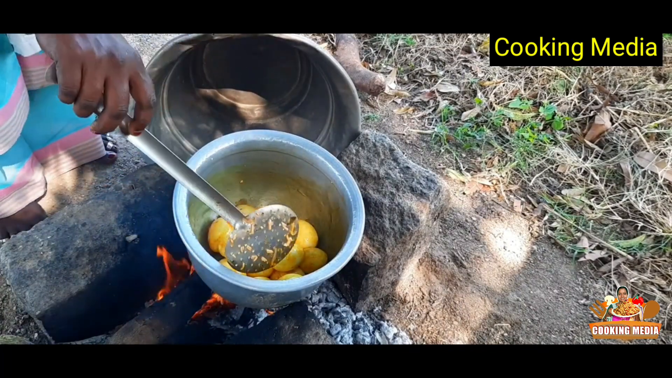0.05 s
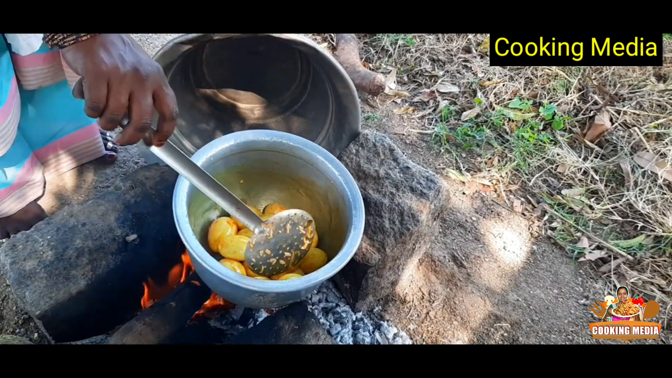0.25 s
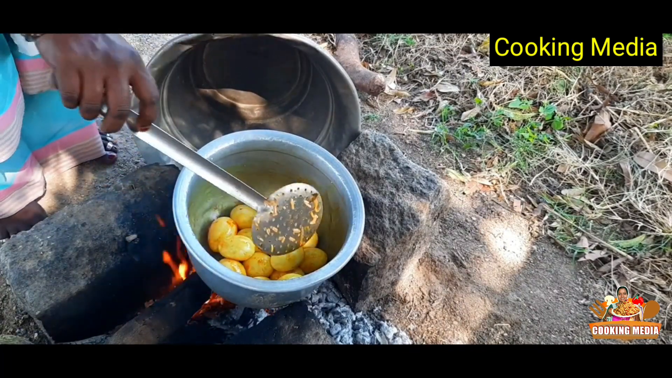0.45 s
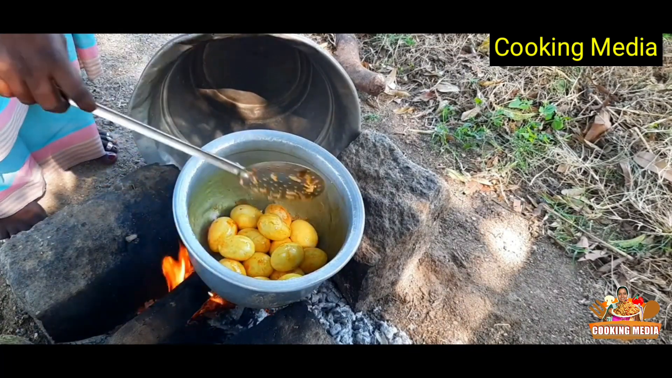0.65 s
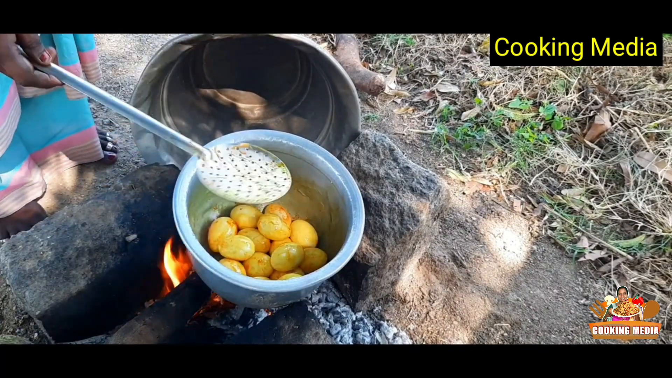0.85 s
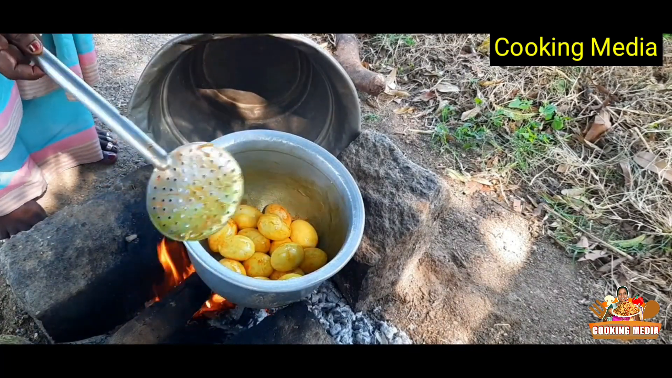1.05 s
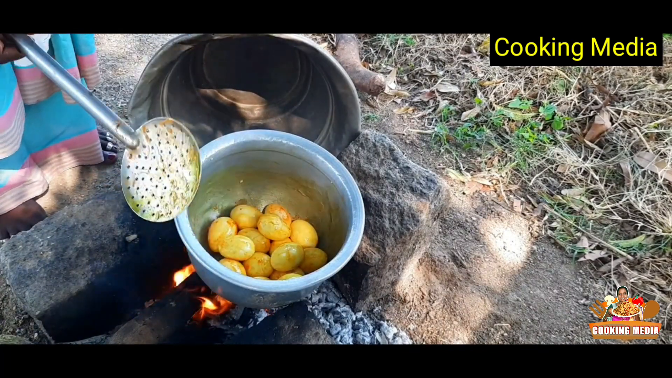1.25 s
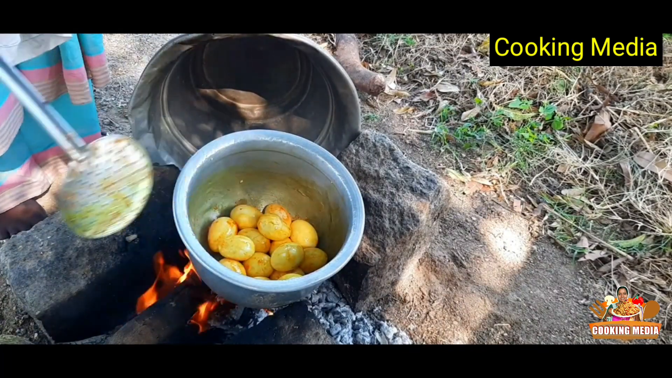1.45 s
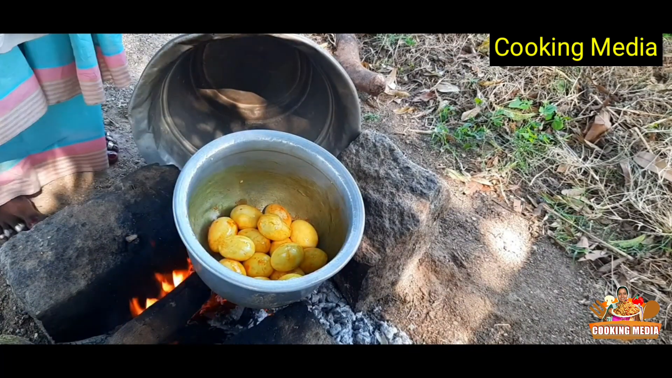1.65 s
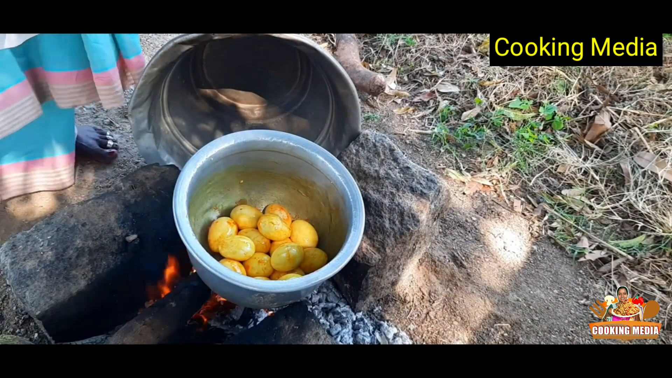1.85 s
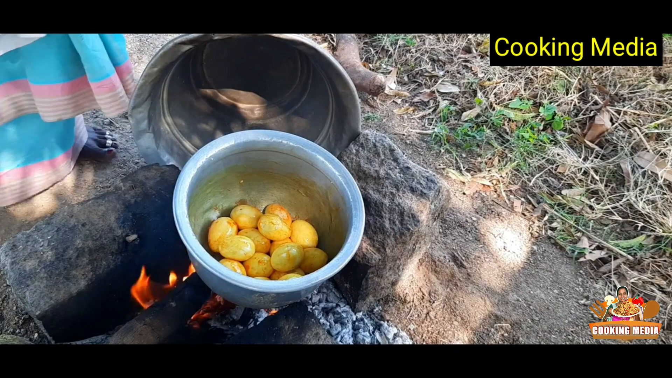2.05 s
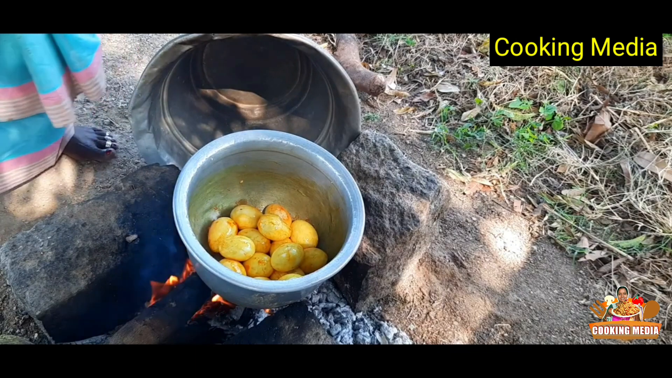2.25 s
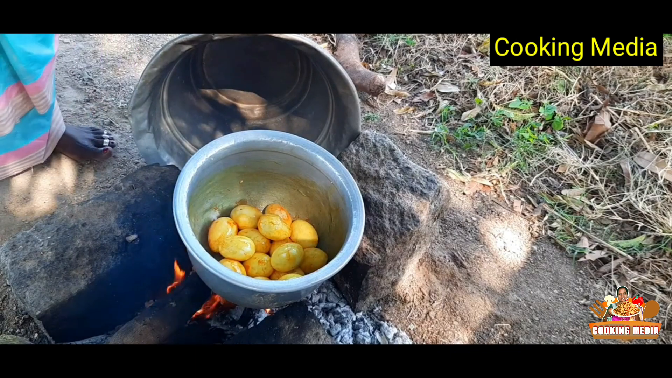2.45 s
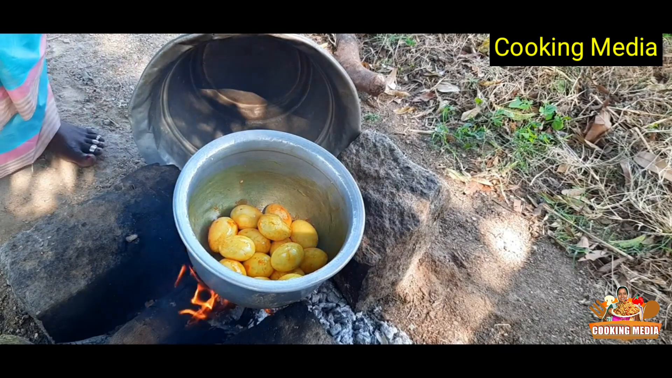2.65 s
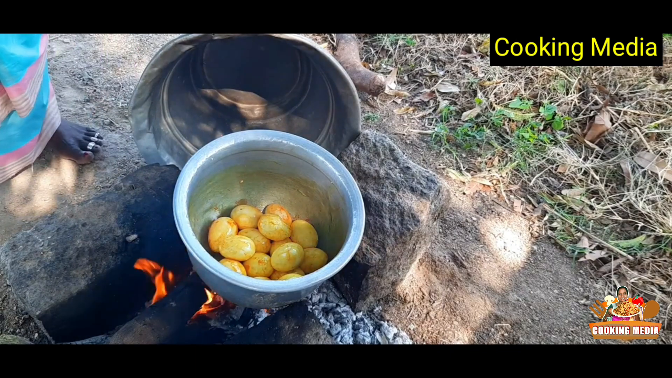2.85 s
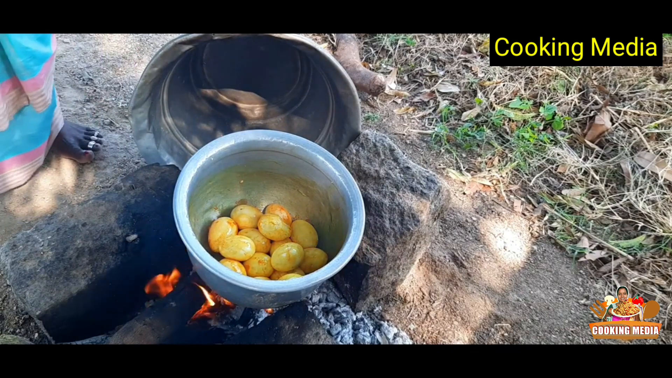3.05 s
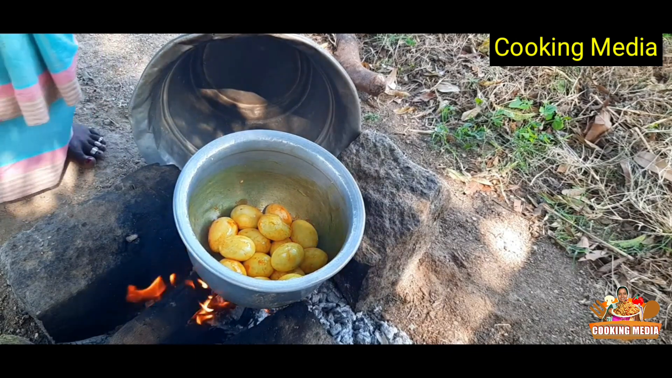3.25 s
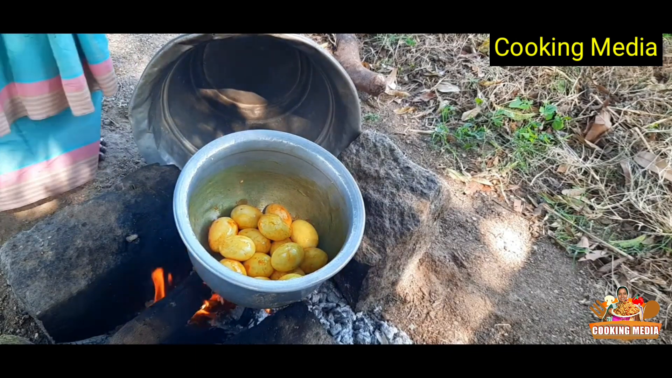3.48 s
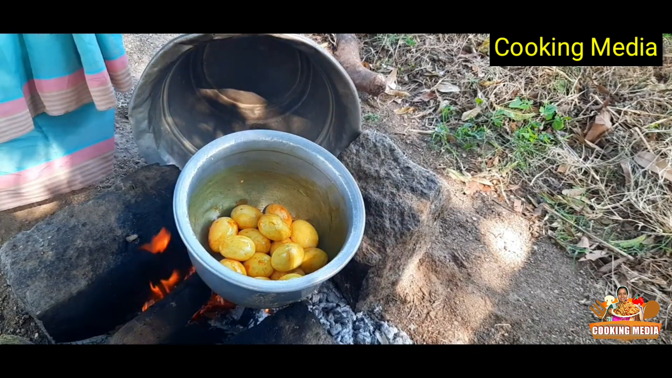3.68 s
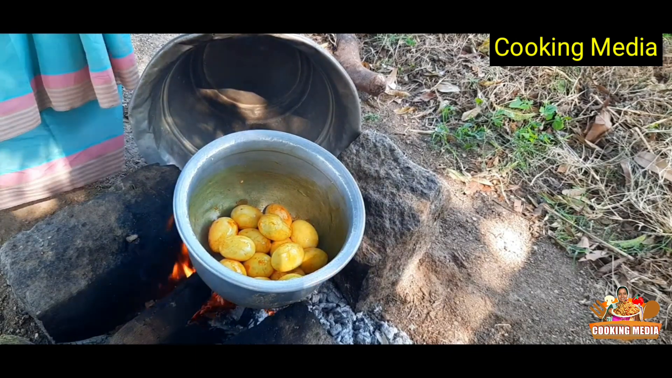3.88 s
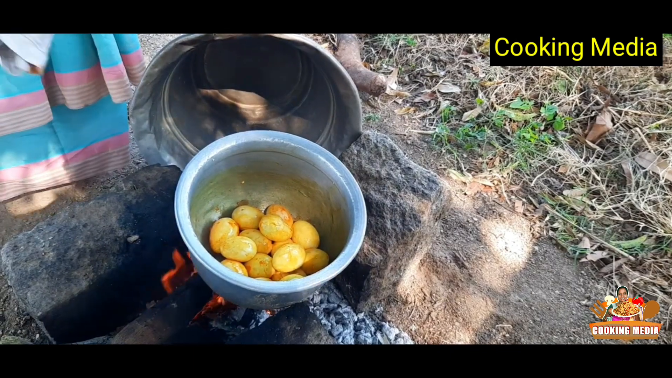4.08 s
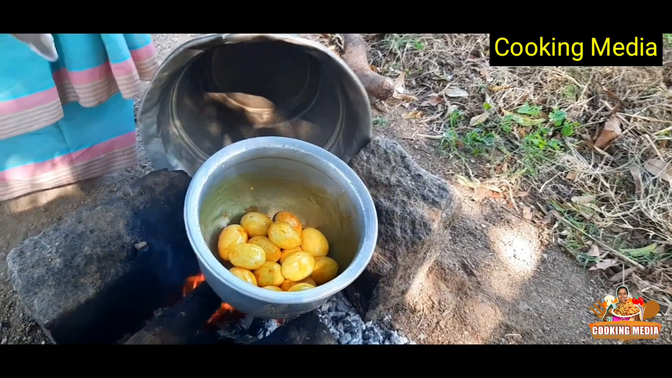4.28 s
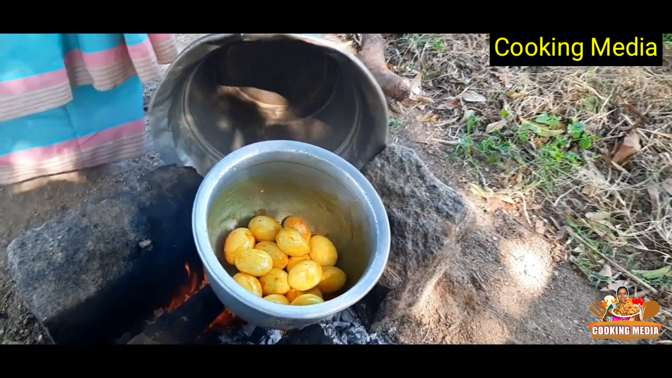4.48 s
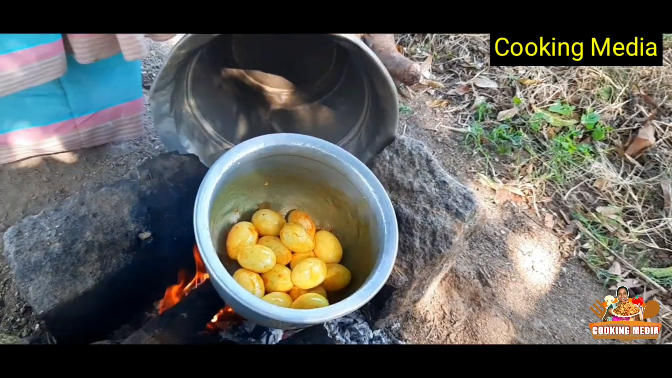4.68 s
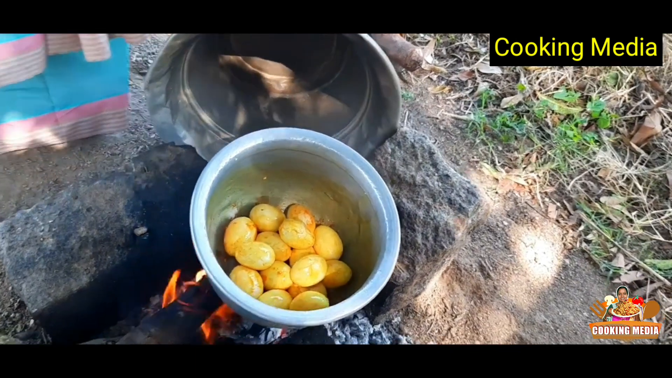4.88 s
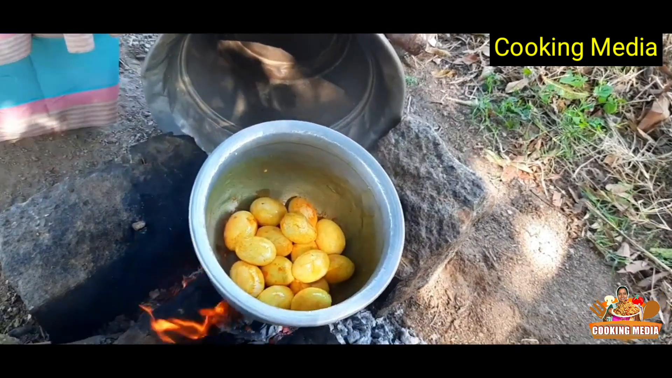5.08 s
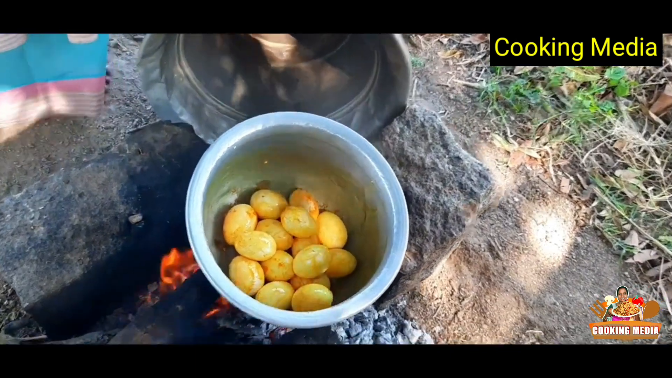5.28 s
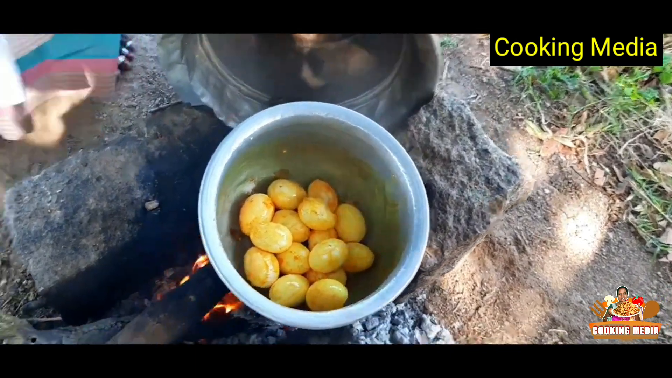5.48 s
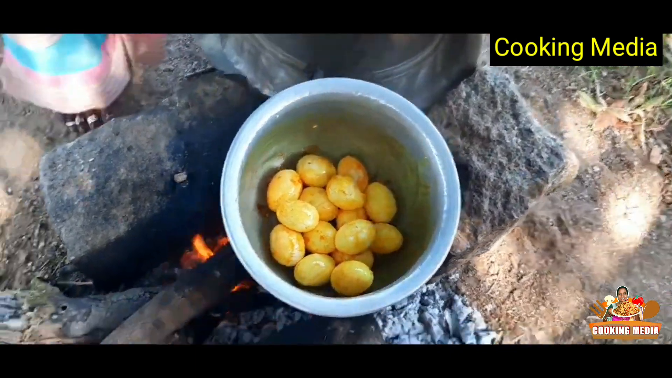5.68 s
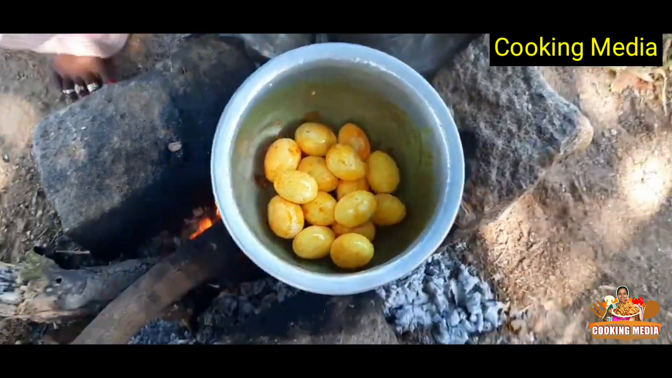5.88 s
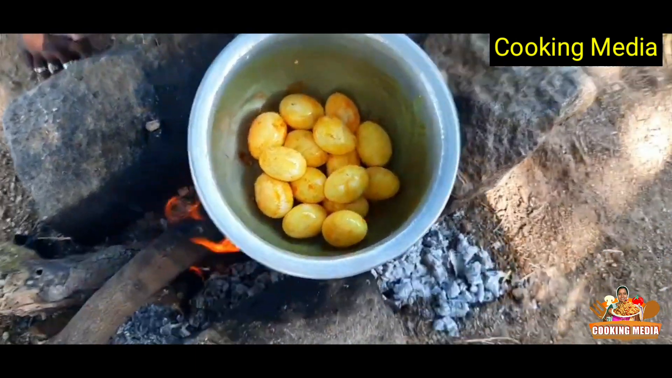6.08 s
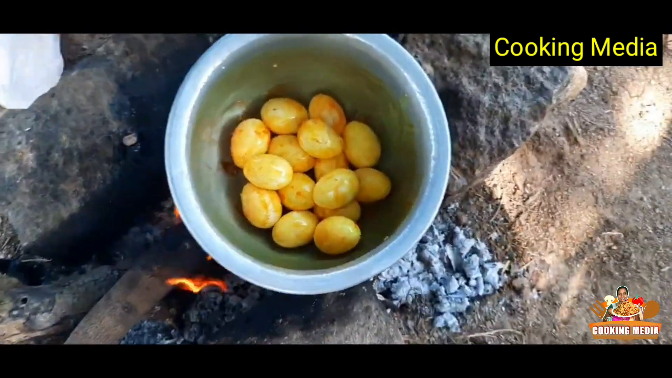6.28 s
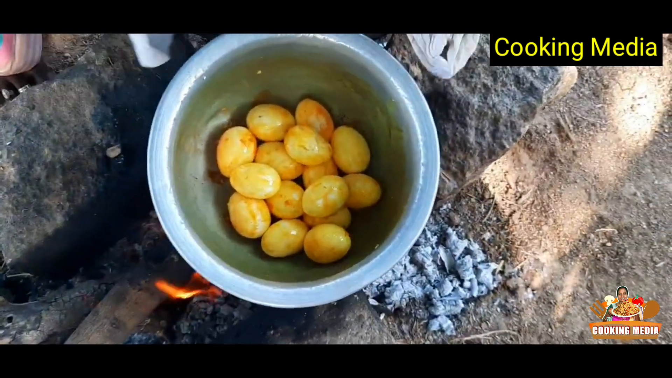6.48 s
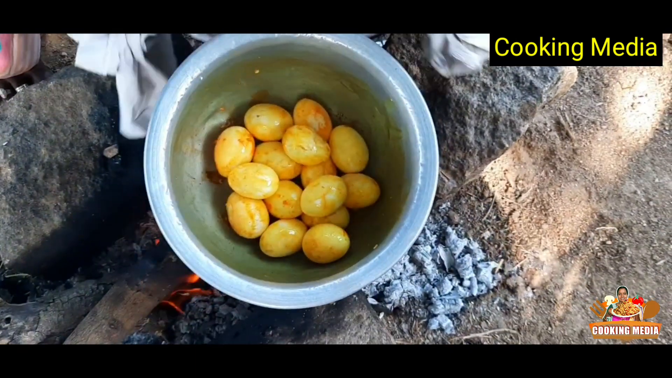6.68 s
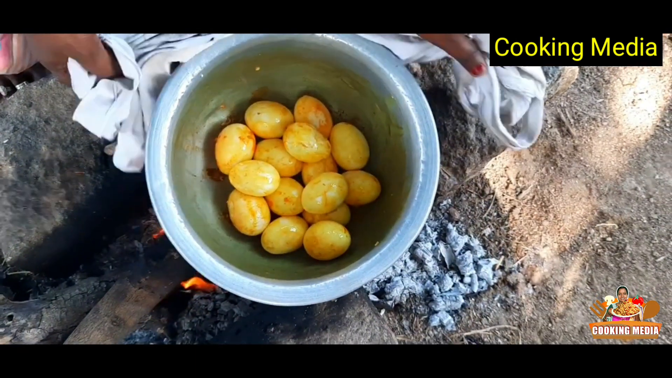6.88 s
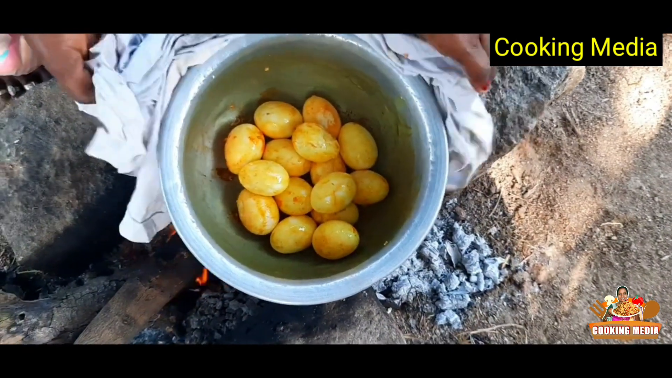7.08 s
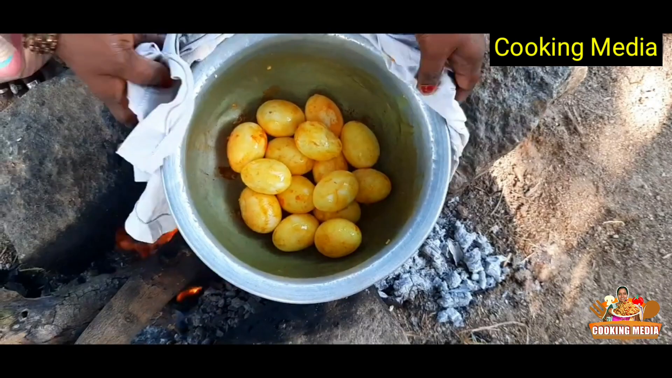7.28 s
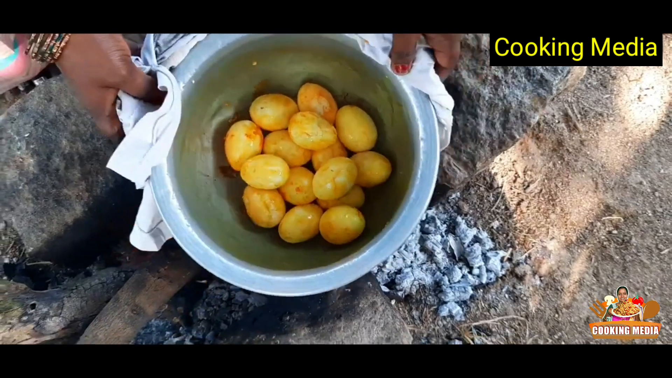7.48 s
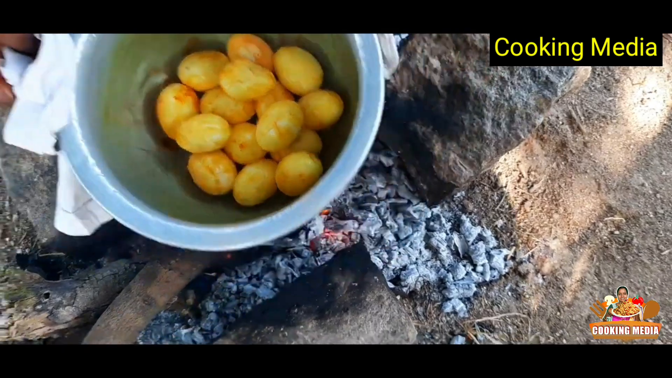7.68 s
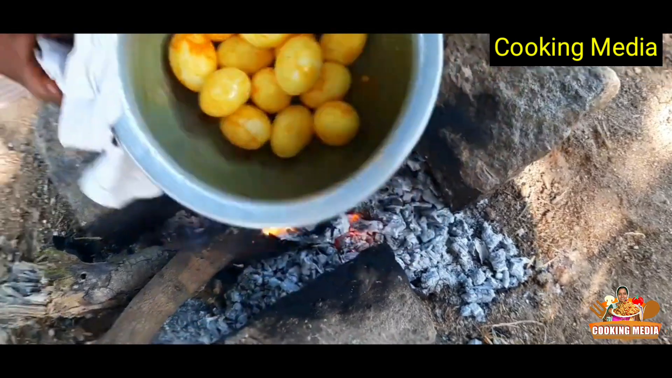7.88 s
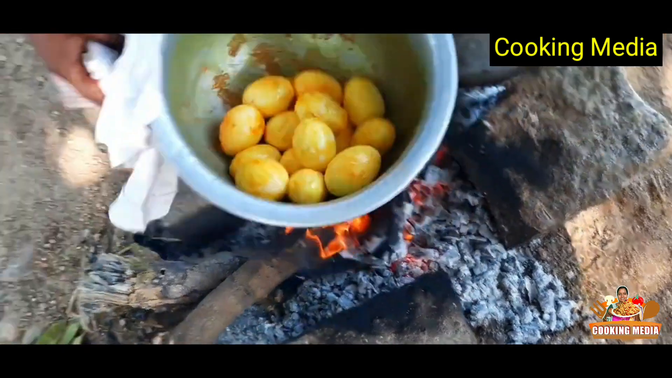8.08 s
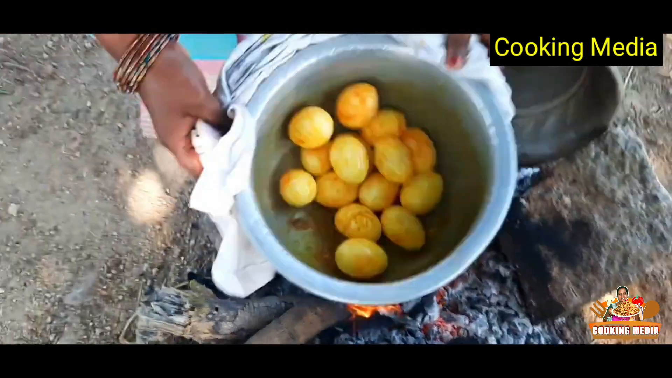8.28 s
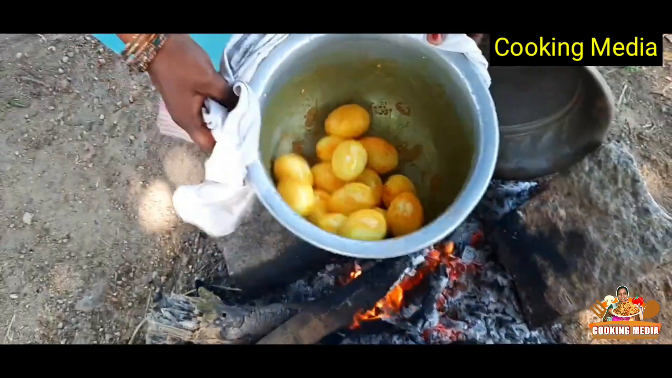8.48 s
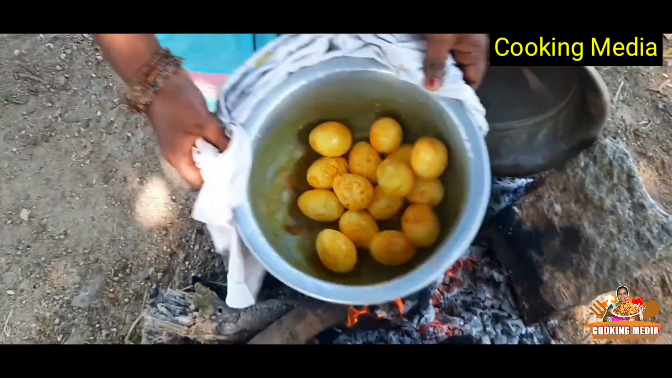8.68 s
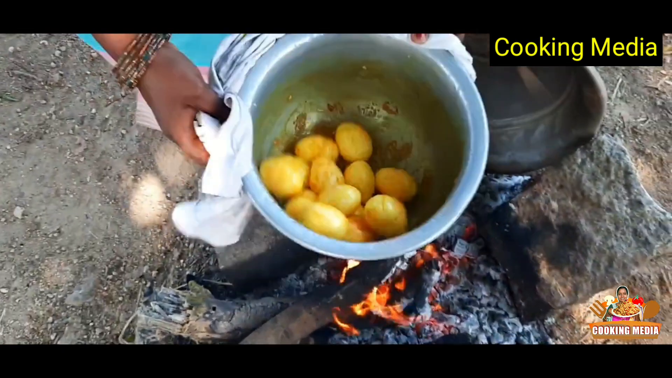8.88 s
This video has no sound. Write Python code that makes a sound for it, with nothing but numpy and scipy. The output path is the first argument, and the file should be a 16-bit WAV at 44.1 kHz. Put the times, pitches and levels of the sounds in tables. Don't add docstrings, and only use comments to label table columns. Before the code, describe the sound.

Eggs sizzle in a little hot oil in a thin metal pot, spitting sharply outdoors, then the fizz surges as the pot is lifted.

```python
import sys
import numpy as np
from scipy import signal
from scipy.fft import rfft, irfft, next_fast_len
from scipy.io import wavfile
from scipy.ndimage import uniform_filter1d, map_coordinates

SR = 44100
rng = np.random.default_rng(int(sys.argv[2]) if len(sys.argv) > 2 else 0)


def store_pcm(level_fs):
    pcm = np.round(np.clip(level_fs, -1, 1) * 32767).astype(np.int16)
    wavfile.write(sys.argv[1], SR, np.atleast_2d(pcm).T)


def natural_amplitude(level_db):
    exponent = np.asarray(level_db, float) / 20
    return 10 ** exponent


N = 394241
PORT_LAG = 0.00012

# (time [s], level [dB])
SIZZLE = [(0.0, -49), (0.9, -50), (1.5, -48.5), (1.76, -50.5), (1.97, -48.5), (2.32, -52), (2.8, -47.5),
          (3.1, -51.5), (3.41, -49), (3.58, -53), (4.13, -52.5), (4.9, -49), (5.39, -51), (5.65, -45.5),
          (6.12, -45), (6.5, -47.5), (7.3, -44), (7.75, -40.5)]
# (time [s], hold [s], fizz level [dB], time to fade 20 dB [s], share of larger bubbles [dB])
WAVES = [(7.814, .02, -36.5, 0.9, -8), (7.87, 0.036, -30.5, 0.11, -19), (7.975, 0.057, -32.5, 0, -14.5),
         (8.092, .025, -37, 0.5, -8), (8.227, .05, -33.5, 0.2, -9), (8.32, 0.023, -31.5, 0.06, -10),
         (8.385, 0.041, -31.5, 0.1, -11), (8.494, 0.044, -39, -0.5, -13.5), (8.655, .01, -35.5, -0.4, -11),
         (8.683, 0.017, -35, 0.1, -0.5), (8.734, 0.045, -33.5, 0.32, -7)]
# (time [s], hold [s], fizz level [dB])
SPUTTERS = [(1.188, .008, -47), (5.889, .003, -34), (6.105, 0.0035, -46), (6.426, 0.0032, -37),
            (6.744, 0.017, -40.5), (6.777, 0.0094, -42), (6.907, 0.0099, -39.5), (7.187, 0.0066, -39),
            (7.207, 0.011, -36.5), (7.34, .006, -50), (7.483, 0.027, -49), (7.535, 0.045, -41.5),
            (7.602, 0.0068, -41), (7.647, 0.015, -38.5)]
# (frequency [Hz], gain [dB])
FIZZ_COLOUR = [(1470, -51), (2500, -0.5), (3570, 0), (4410, -3), (4700, -1.5), (5820, -2), (9050, 0.5),
               (10900, -1), (14800, 0), (15900, -2), (16500, -64)]
# (frequency [Hz], gain [dB])
STEAM_COLOUR = [(1470, -54), (2500, -8), (7030, -3.5), (7670, -6), (8500, -2.5), (13700, -1.5),
                (15700, -3.5), (16100, -37), (16500, -84)]
# (frequency [Hz], width [Hz], level [dB])
POT_AIR = [(553, 105, -2.5), (1068, 125, -4), (1696, 480, 1.5), (2510, 700, -2)]
# (time [s], gain of the band round 860 Hz [dB], gain round the lowest
# note, 570 Hz [dB])
TONE_BALANCE = [(0, -18, -0.5), (2.5, -12, 1.5), (4, -3, -1.5), (6.4, -7, 3), (7.2, 5, 2), (7.9, 1.5, -1.5),
                (8.3, 1, -4), (8.94, 2, -5.5)]
# (time [s], level [dB])
FLAME = [(0.0, -72), (0.32, -60), (0.69, -67), (1.27, -68.5), (1.62, -56.5), (1.75, -68), (2.56, -65.5),
         (2.79, -57.5), (3.36, -58), (3.63, -60.5), (4.03, -55), (5.23, -56.5), (7.9, -55.5), (8.84, -55.5)]
# (frequency [Hz], gain [dB])
ROAR_COLOUR = [(88, -19), (150, -6.5), (263, 4.5), (323, -2), (358, -4), (540, 1.5), (721, -10),
               (1400, -22), (1820, -46), (3080, -120)]
# (start [s], end [s], frequency [Hz], level [dB])
FAR_TONES = [
    (2.723, 2.802, 2200, -53),
    (3.6, 4.1, 360, -63),
    (4.037, 4.33, 358.4, -58.5),
]
# (peak time [s], peak level [dB], time to fade 20 dB [s], left over right [dB])
GUSTS = [(0.0, -48, 0.13, 2), (.15, -56, 0.5, 3), (0.239, -47.5, 0.3, -3), (0.911, -53, 0, 2),
         (1.039, -38, 0.37, 11), (1.14, -50, 0.3, 2), (1.491, -44, 0, 11.5), (1.569, -44.5, 0.36, 4),
         (1.71, -41.5, 0.17, 4), (2.05, -39, 0.2, -2), (2.1, -39, 0.17, -1), (2.93, -53.5, 1.1, -9),
         (3.29, -55, -0.5, -10), (3.5, -51, 0.16, 8), (3.621, -50.5, 0.2, -3), (3.72, -56, .15, -13),
         (4.01, -52, 0.5, -1), (4.29, -53, 0.6, 4), (4.699, -58.5, 1, -2), (5.2, -48.5, 0.7, -3),
         (5.411, -50.5, 0.5, -5), (5.84, -40, 0.2, 4), (6.004, -42.5, -0.5, -1), (6.159, -37.5, 0.5, -18),
         (6.31, -45, 0.4, -6), (6.362, -34.5, 0.06, 0.5), (6.6, -38.5, 0.14, -7), (6.739, -50.5, 0.7, -16),
         (7.07, -45, 0.6, -14), (7.3, -46, 0.56, -7), (7.418, -39, .5, -3), (8.352, -52.5, 1.2, -10)]
# (frequency [Hz], gain [dB])
BUFFET_COLOUR = [(12, -50), (26, 5), (92, 5.5), (179, -7.5), (267, -12), (303, -22.5), (420, -25.5),
                 (458, -29), (600, -19.5), (780, -41), (1320, -120)]
# (time [s], peak level [dB], centre [Hz], dull part [dB])
SPITS = [(0.1182, -24, 13650, -17), (0.835, -24, 8000, -15), (0.454, -28, 3500, 3),
         (0.8858, -24.5, 6650, -5.5), (1.2912, -19.5, 7330, -15), (1.5273, -19, 13100, -13.5),
         (1.618, -21.5, 8600, -13), (1.6721, -22.5, 6950, -17), (2.112, -20, 11700, 4),
         (2.704, -21, 13700, -18.5), (2.9388, -21.5, 14700, -17), (3.487, -21.5, 9200, -11),
         (4.334, -20, 13400, -16), (4.4172, -19.5, 14300, -17), (4.6883, -22, 9200, -26),
         (5.1685, -27, 11700, -9), (5.424, -22, 11300, -10), (5.8077, -18.5, 13500, -4.5),
         (5.952, -8, 12100, -30), (5.886, -11.5, 11300, -28), (6.105, -17.5, 10000, -33),
         (6.2398, -12.5, 12600, -34), (6.344, -20, 14300, -24), (6.4253, -21, 14900, -10),
         (6.5712, -21.5, 10900, -25), (6.601, -19.5, 12300, -11.5), (6.799, -16.5, 6800, -31),
         (7.059, -12, 13700, -54), (7.181, -19, 12900, -23), (7.214, -18.5, 13700, -21),
         (7.759, -17, 12300, -23), (7.7704, -14, 14300, -42)]
# (time [s], peak level [dB], centre [Hz], dull part [dB])
SPLATS = [(1.1014, -30, 10200, -9.5), (2.534, -24.5, 11900, -11), (3.013, -25, 9930, -21),
          (3.3787, -21.5, 8460, -11), (3.575, -22.5, 10100, -14), (4.364, -19, 15200, -11),
          (5.098, -26.5, 10500, -5), (5.587, -22, 14000, -10), (5.956, -18, 11000, -30),
          (6.2213, -21, 11300, -8.5), (6.7494, -19.5, 12200, -5), (6.769, -21, 8300, -24),
          (7.347, -23.5, 11500, -36), (7.652, -15.5, 12400, -25)]
# (time [s], peak level [dB])
TICKS = [(0.452, -50), (1.316, -25), (1.6562, -27), (1.806, -28), (1.94, -24.5), (2.066, -27), (2.099, -26),
         (2.31, -28), (2.5162, -26.5), (2.6587, -26), (3.435, -23.5), (3.864, -25), (3.932, -29),
         (4.0449, -28), (4.6184, -23), (5.012, -23), (5.182, -23), (5.2892, -22), (5.532, -22),
         (5.645, -21.5), (5.833, -21), (6.6887, -21), (6.706, -20), (6.883, -22), (6.908, -21),
         (7.245, -17), (7.31, -22.5), (7.519, -18), (7.5895, -17), (7.81, -18), (2.5022, -33),
         (4.6785, -31), (5.085, -39), (5.4076, -39), (5.817, -25), (6.5475, -28), (6.585, -26),
         (7.043, -26), (7.1957, -19), (7.291, -29), (7.7398, -24),
         (0.4399, -35), (0.5342, -39), (0.5772, -33.5), (0.629, -31), (0.65, -31), (0.993, -32),
        (1.1917, -29), (1.4815, -27), (1.589, -27), (1.9016, -38), (2.1318, -29), (2.1585, -31),
        (2.3494, -29), (2.4279, -28.5), (2.4833, -40), (2.852, -28), (2.8847, -28), (3.1038, -38),
        (3.237, -27), (3.287, -29), (3.329, -40), (3.7384, -31), (3.9125, -27), (3.9614, -33), (4.131, -31),
        (4.6623, -37), (4.8254, -36), (4.8429, -29.5), (4.8916, -29), (5.1327, -26), (5.5633, -23.5),
        (5.665, -26.5), (5.7264, -31), (5.9697, -20), (5.9853, -23.5), (6.0437, -29), (6.0606, -27),
        (6.3004, -30), (6.317, -24), (6.8164, -24), (6.9476, -25), (7.0734, -27), (7.2654, -21.5),
        (7.4664, -28), (7.5388, -23), (7.6014, -21), (7.614, -21.5), (7.7902, -22),
         (.710, -35), (.873, -33.5), (1.113, -30), (1.301, -27), (1.604, -26), (1.642, -27), (1.691, -29),
         (1.788, -32), (2.008, -33), (2.029, -33), (2.551, -31), (2.578, -34), (2.677, -27), (2.776, -30),
         (2.794, -34), (2.834, -30), (3.450, -28), (3.507, -32), (3.522, -30), (3.593, -34), (3.894, -30),
         (4.148, -33), (4.356, -29), (4.454, -28), (4.492, -28), (4.587, -33), (4.710, -29), (4.958, -34),
         (4.979, -35), (5.031, -31), (5.114, -28), (5.315, -33), (5.328, -37), (5.464, -26), (5.480, -32),
         (5.492, -32), (5.875, -27), (5.922, -29), (6.400, -31), (6.447, -28), (6.461, -29), (6.724, -23),
         (6.737, -29), (6.780, -24), (6.938, -24), (7.090, -30), (7.166, -27), (7.236, -27), (7.335, -27),
         (7.558, -17.5), (7.911, -16), (8.003, -15.5), (8.740, -18.5)]
# (frequency [Hz], gain [dB])
SPIT_COLOUR = [(800, -18), (3000, -28), (6000, -14), (8500, -6.5), (13000, -4), (16000, -8.5), (18000, -57)]
# (start [s], end [s], centre [Hz], width [log Hz])
SHADES = [(.15, .39, 4900, .1), (.92, .99, 4200, .14), (1.4, 1.46, 4500, .18), (1.65, 1.8, 4250, .17),
          (1.99, 2.06, 4800, .12), (2.2, 2.28, 4700, .1), (2.59, 2.65, 4000, .1), (2.71, 2.84, 4900, .11),
          (3.04, 3.14, 4500, .2), (3.5, 3.56, 4800, .17), (3.6, 3.66, 4700, .13), (3.76, 3.96, 4200, .14),
          (4.07, 4.14, 4000, .1), (4.48, 4.6, 4900, .1), (5.2, 5.3, 4500, .14), (6.245, 6.3, 4600, .1),
          (6.36, 6.4, 3900, .09), (6.47, 6.54, 3400, .13), (6.78, 6.84, 3450, .2), (6.92, 6.99, 3700, .15),
          (7.075, 7.12, 4300, .2), (7.49, 7.65, 3950, .08), (7.87, 8.09, 4000, .17),
          (8.82, 8.93, 5600, .08), (8.8, 9, 4500, .035)]
# (time [s], peak level [dB], swing [Hz])
PUFFS = [(1.24, -43, 100), (1.827, -43, 90), (1.877, -46, 100), (2.794, -48, 90), (2.975, -45, 120),
         (5.423, -41, 110), (7.515, -36, 110), (.24, -46, 160), (1.0, -40, 150), (1.045, -38, 190),
         (1.495, -44, 180), (1.705, -39, 110), (2.047, -38, 130), (2.097, -39, 150), (4.295, -48, 80),
         (6.007, -35.5, 129), (6.16, -29.5, 232), (6.175, -34, 254), (6.23, -35, 192), (6.32, -32.5, 196),
         (6.363, -32, 169), (6.385, -29, 170), (6.6, -39, 140), (6.626, -34, 130), (6.742, -44, 150),
         (7.416, -29, 109), (7.459, -43, 120)]
# (time [s], peak level [dB], note [Hz], time to fade 60 dB [s])
KNOCKS = [(0.255, -44, 624, 0.052), (4.164, -43.5, 1710, .03), (4.759, -43.5, 1720, 0.02),
          (5.934, -39.5, 2000, .02), (6.775, -45, 590, 0.055), (6.836, -43.5, 600, 0.062),
          (7.873, -41, 555, 0.046), (8.229, -42.5, 714, .05), (7.668, -41, 800, 0.026),
          (0.452, -38, 2410, 0.053), (0.71, -44, 1810, 0.024), (1.195, -42.5, 636, 0.037),
          (1.289, -43, 1690, 0.019), (1.292, -41.5, 525, 0.023), (2.137, -47, 553, 0.068),
          (1.526, -39, 1750, 0.02), (1.923, -40, 2140, 0.035), (2.114, -43, 2220, 0.044),
          (2.627, -40.5, 1780, 0.031), (2.935, -42.5, 553, 0.04), (3.485, -48, 533, 0.047),
          (3.54, -46, 570, 0.033), (3.901, -39.5, 2510, 0.034), (4.334, -44, 1930, 0.12),
          (4.366, -33.5, 1800, 0.02), (4.362, -41.5, 436, .06), (4.484, -44, 520, 0.039),
          (4.428, -40, 1640, 0.037), (5.015, -36.5, 587, 0.023), (5.084, -43, 513, 0.051),
          (5.422, -43, 593, 0.03), (5.886, -36, 1700, 0.048), (5.951, -48, 2070, 0.036),
          (7.004, -32, 1850, 0.033), (7.057, -35, 1870, 0.019), (7.18, -35.5, 1580, 0.017),
          (7.232, -33.5, 580, 0.022), (7.439, -45, 1700, 0.043), (7.536, -43, 1740, 0.047),
          (7.668, -26, 1610, 0.036), (7.811, -35, 1640, 0.016), (8.026, -34, 1560, 0.048),
          (8.106, -29, 1020, 0.029), (8.603, -48.5, 2400, 0.073), (8.677, -32.5, 1690, 0.038),
          (8.774, -34.5, 1700, 0.043), (8.713, -35.5, 1570, 0.079)]
# (time [s], level [dB])
DRAG = [
    (2.8, -60),
    (3, -59.5),
    (3.15, -49.5),
    (3.27, -51.5),
    (3.45, -63),
]
# (frequency [Hz], width [Hz], level [dB])
BLADE = [(800, 294, 0), (1154, 240, 0.0039)]


def unit(x):
    return x / np.sqrt(np.mean(x ** 2) + 1e-20)


def along(points, hz):
    f, db = np.transpose(points)
    return natural_amplitude(np.interp(np.log(hz + 1), np.log(f + 1), db))


def hump(hz, centre, width):
    return np.exp(-(np.log((hz + 1) / centre) / width) ** 2)


def curves(rows):
    s, *columns = np.transpose(rows)
    return [np.interp(np.arange(N) / SR, s, column) for column in columns]


def wobble(rate):
    at = np.arange(0, N, 32)
    knots = rng.standard_normal(int(N * rate / SR) + 4)
    return np.interp(np.arange(N), at, map_coordinates(knots, [at * rate / SR]))


def filtered(x, response):
    size = next_fast_len(x.shape[-1] + 4096)
    spectrum = rfft(x, size) * response(np.fft.rfftfreq(size, 1 / SR))
    return irfft(spectrum, size)[..., :x.shape[-1]]


def ports(lag):
    def response(hz):
        turn = np.exp(1j * np.pi * hz * lag)
        return np.array([turn, turn.conj()])
    return response


def pair(alike, size):
    a, b = rng.standard_normal((2, size))
    turn = np.arccos(alike) / 2
    return np.cos(turn) * a + np.sin(turn) * b * np.array([[1], [-1]])


def resonances(modes):
    def response(f):
        total = 0
        for k, (centre, width, db) in enumerate(modes):
            damping = 1j * f * width
            total = total + (-1) ** k * natural_amplitude(db) * damping / (centre ** 2 - f ** 2 + damping)
        return total
    return response


def slosh():
    t = np.arange(0, N, 64) / SR

    def swell(s, hold, db, rise, fade):
        away = np.maximum((s - t) / rise, (t - s - hold) / fade)
        return natural_amplitude(2 * db - 40 * np.maximum(away, 0))

    s, hold, db, fade, large_db = np.transpose(WAVES)[..., None]
    waves = swell(s, hold, db, 0.16, np.maximum(fade, 0.03))
    sputters = swell(*np.transpose(SPUTTERS)[..., None], 0.011, 0.011).sum(0)
    calm = natural_amplitude(2 * np.interp(t, *np.transpose(SIZZLE)))
    rest = calm + sputters
    total = rest + waves.sum(0)
    rest_large_db = -11.5 * np.clip((t - 7.5) / 0.5, 0, 1)
    large = ((waves * large_db).sum(0) + rest * rest_large_db) / total
    oil_db = 10 * np.log10(calm + waves.sum(0))
    return curves(np.transpose([t, 10 * np.log10(total), large, oil_db]))


def patches(x, depth_db):
    z = signal.stft(x, nperseg=512)[2]
    field = rng.standard_normal(z.shape[1:])
    for axis in (0, 1):
        field = uniform_filter1d(field, size=8, axis=axis)
    return signal.istft(z * natural_amplitude(depth_db * unit(field)), nperseg=512)[1][:, :N]


def crackle():
    t = np.arange(600) / SR - 0.003
    shape = natural_amplitude(-60 * np.abs(t) / 0.002)
    out = np.zeros((2, N))
    count = int(0.007 * N / 2)
    for spot in (-1, 1):
        when = (rng.random(count) * N).astype(int)
        size_db = 5 * np.minimum(rng.exponential(1, count), 1.7)
        blows = np.bincount(when, natural_amplitude(size_db), N)
        gate = signal.oaconvolve(blows, shape)[:N]
        bursts = gate * pair(0.7, N)
        out += filtered(bursts, ports(PORT_LAG * (1 + 0.33 * spot)))
    return unit(out)


def sizzle():
    fizz_db, large_db, oil_db = slosh()
    lifted = np.clip((np.arange(N) / SR - 7.5) / 0.5, 0, 1)
    surge = natural_amplitude((1 - 0.68 * lifted) * (0.81 * wobble(9) + 1.52 * wobble(45)))
    grains = crackle()

    smooth = patches(filtered(pair(0.082, N), ports(PORT_LAG)), depth_db=2.5)
    smooth_fizz = unit(filtered(smooth, lambda hz: along(FIZZ_COLOUR, hz)))
    grain_fizz = unit(filtered(grains, lambda hz: along(FIZZ_COLOUR, hz)))
    fizz = natural_amplitude(-1.0) * smooth_fizz + natural_amplitude(-5.5) * grain_fizz

    froth = patches(filtered(pair(0.18, N), ports(0.5 * PORT_LAG)), depth_db=2.5) + 0.35 * grains
    steam = unit(filtered(froth, lambda hz: along(STEAM_COLOUR, hz)))
    large = filtered(steam, lambda hz: 1 / (1 + (hz / 5900) ** 12))
    steam = steam + large * (natural_amplitude(large_db + 9.0) - 1)

    stir = patches(filtered(pair(1.0, N), ports(0.56 * PORT_LAG)), depth_db=3.0) + natural_amplitude(-1.5) * grains
    hollow = unit(filtered(stir, lambda hz: resonances(POT_AIR)(hz) / (1 + (hz / 3000) ** 8)))
    hollow_db = oil_db - 5.5 + 0.39 * large_db - 2 * lifted

    bright = (1 - lifted) * natural_amplitude(1.5) * fizz + lifted * natural_amplitude(1.3) * steam
    return surge * (natural_amplitude(fizz_db + 1.23) * bright + natural_amplitude(hollow_db) * hollow)


def fire():
    roar = unit(filtered(pair(0.87, N), lambda hz: along(ROAR_COLOUR, hz)))
    out = roar * natural_amplitude(curves(FLAME)[0] - 3.0 + 3.0 * wobble(15))
    t = np.arange(N) / SR
    for start, end, hz, db in FAR_TONES:
        edge = 0.087 * (end - start)
        fade = np.clip(np.minimum(t - start, end - t) / edge, 0, 1)
        swell = natural_amplitude(db + 2.4 * wobble(14))
        out = out + swell * fade * np.sin(2 * np.pi * hz * t + 0.44 * wobble(10))
    return out


def balanced(x):
    gap_db, low_db = curves(TONE_BALANCE)
    gap = filtered(x, lambda hz: hump(hz, 860, 0.18))
    low = filtered(x, lambda hz: hump(hz, 570, 0.18))
    return x + (natural_amplitude(gap_db) - 1) * gap + (natural_amplitude(low_db) - 1) * low


def gusts():
    t = np.arange(0, N, 64) / SR
    s, db, fade, pan_db = np.transpose(GUSTS)[..., None]
    rise_over_fade = 0.41
    away = np.where(t > s, t - s, (s - t) / rise_over_fade) / np.maximum(fade, 0.05)
    each = natural_amplitude(db - 20 * away)
    both = []
    for side in (1, -1):
        power = ((each * natural_amplitude(side * 0.34 * pan_db)) ** 2).sum(0)
        pressure = np.sqrt(natural_amplitude(2 * -71.5) + power)
        both.append(np.interp(np.arange(N) / SR, t, pressure))
    return np.array(both)


def slaps():
    out, t = np.zeros((2, N + 8192)), np.arange(8192) / SR
    for s, db, _, pan_db in GUSTS:
        hz = 95 * (0.74 + 0.574 * rng.random())
        turn = rng.random((2, 1))
        swing = np.sin(2 * np.pi * (hz * t + turn)) * (1 - np.exp(-t / 0.0025))
        level_db = db + 6.5 - 60 * t / 0.15 + 0.34 * pan_db * np.array([[1], [-1]])
        at = round(s * SR)
        out[:, at:at + len(t)] += swing * natural_amplitude(level_db)
    return out[:, :N]


def wind():
    push = gusts()
    level_db = 10 * np.log10(push[0] * push[1])
    lumps = natural_amplitude(3.9 * np.array([wobble(30), wobble(30)]))
    rumble = unit(lumps * filtered(pair(0.03, N), lambda hz: along(BUFFET_COLOUR, hz)))
    flap = unit(lumps ** 1.7 * filtered(pair(0.1, N), lambda hz: hump(hz, 260, 0.5)))
    flap_db = np.minimum(1.65 * (level_db + 35.0), 0) - 13.5
    return (rumble + flap * natural_amplitude(flap_db)) * push * natural_amplitude(2.0) + slaps()


def bubbles():
    dry_spray_db, wet_spray_db = -16.5, -7.5
    out = [(s, db, hz, dry_spray_db, dull_db) for s, db, hz, dull_db in SPITS]
    out += [(s, db, hz, wet_spray_db, dull_db) for s, db, hz, dull_db in SPLATS]
    for s, db in TICKS:
        hz = 10500 * np.exp(0.24 * rng.standard_normal())
        dull_db = -17.5 + 4 * rng.standard_normal()
        out.append((s, db, hz, dry_spray_db, dull_db))
    return out


def spits():
    out, t = np.zeros((2, N + 2048)), np.arange(2048) / SR - 0.004
    for s, db, centre, spray_db, dull_db in bubbles():
        crack = natural_amplitude(-60 * np.where(t > 0, t / 0.0028, -t / 0.002))
        spray = natural_amplitude(spray_db - 60 * np.where(t > 0, t / 0.04, -t / 0.03))
        at_ports = ports(PORT_LAG * rng.normal(1, 0.15))

        def colour(hz):
            bright = along(SPIT_COLOUR, hz) * (1 + 1.28 * hump(hz, centre, 0.1))
            dull = natural_amplitude(dull_db + 7.5) * hump(hz, 3800, 0.5)
            return at_ports(hz) * (bright + dull)

        burst = filtered((crack + spray) * pair(0.85, len(t)), colour)
        lean_db = rng.normal(1, 1.9) * np.array([[0.5], [-0.5]])
        at = round((s - 0.0032) * SR)
        out[:, at:at + len(t)] += burst / np.abs(burst).max() * natural_amplitude(db + 2.5 + lean_db)
    return out[:, :N]


def shade(x):
    out = x.copy()
    for start, end, centre, width in SHADES:
        start, end = start - 0.01, end + 0.01
        at = slice(round(start * SR), round(end * SR))
        t = np.arange(at.start, min(at.stop, N)) / SR
        band = filtered(out[:, at], lambda hz: np.exp(-(np.log((hz + 1) / centre) / width) ** 10))
        fade = np.clip(np.minimum(t - start, end - t) / 0.014, 0, 1)
        out[:, at] -= 0.97 * fade * band
    return out


def puffs():
    out, t = np.zeros((2, N + 2048)), np.arange(-1024, 1024) / SR
    for s, db, hz in PUFFS:
        push = np.cos(2 * np.pi * hz * t + 0.57) * np.exp(-(2.03 * hz * t) ** 2)
        lean_db = 2.3 * rng.standard_normal() * np.array([[1], [-1]])
        at = round(s * SR)
        out[:, at:at + len(t)] += push * natural_amplitude(db + lean_db)
    return out[:, 1024:N + 1024]


def knocks():
    notes, breaths, t = np.zeros(N + 4096), np.zeros(N + 4096), np.arange(4096) / SR
    for s, db, hz, t60 in KNOCKS:
        at = slice(round(s * SR), round(s * SR) + len(t))
        note = natural_amplitude(4.0 - 60 * t / t60) * np.sin(2 * np.pi * hz * t) * (1 - np.exp(-t / 0.001))
        snap = natural_amplitude(0.5 - 60 * t / 0.015) * rng.standard_normal(len(t))
        snap = filtered(snap, resonances([(0.87 * hz, 2.0 * hz, 0)]))
        notes[at] += natural_amplitude(db) * (note + snap)
        breaths[at] += natural_amplitude(db + 10.5 - 60 * t / 0.034) * rng.standard_normal(len(t))
    return filtered(notes[:N] + filtered(breaths[:N], resonances(POT_AIR)), ports(PORT_LAG))


def skimmer():
    rub = pair(0.048, N) * natural_amplitude(3.9 * wobble(40))
    ringing = unit(filtered(rub, lambda hz: resonances(BLADE)(hz) ** 2))
    return ringing * natural_amplitude(curves(DRAG)[0])


def scene():
    steady = balanced(sizzle() + fire())
    steady = filtered(steady, lambda hz: hz < 15650)
    frying = shade(steady + spits())
    return frying + knocks() + skimmer() + wind() + puffs()


def top_cut(x):
    return signal.sosfilt(signal.butter(12, 16800, fs=SR, output="sos"), x)


def record(dry):
    def microphone(hz):
        top = 1 / (1 + (hz / 15800) ** 60) + natural_amplitude(-36)
        return top * hz ** 2 / (hz ** 2 + 48 ** 2)
    return top_cut(filtered(dry, microphone))


dry = scene()
out = record(dry)
store_pcm(out)
```